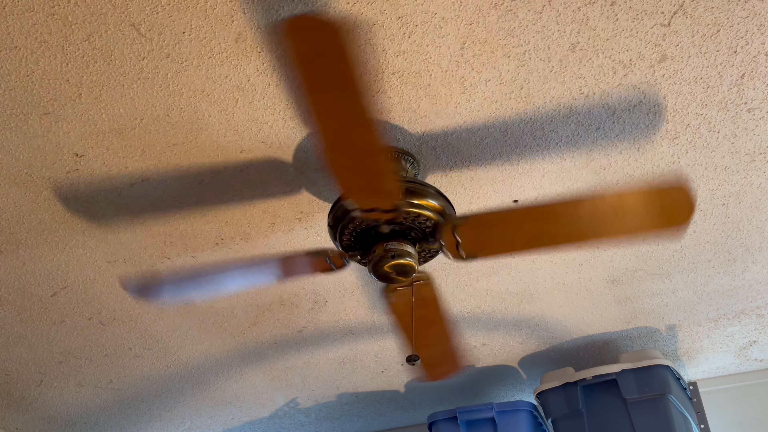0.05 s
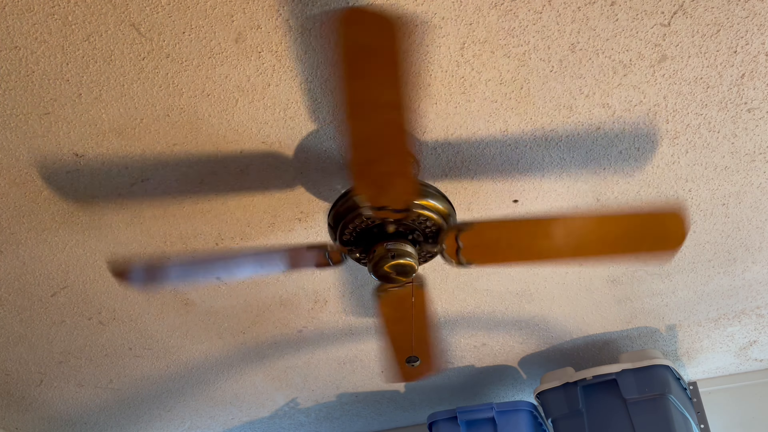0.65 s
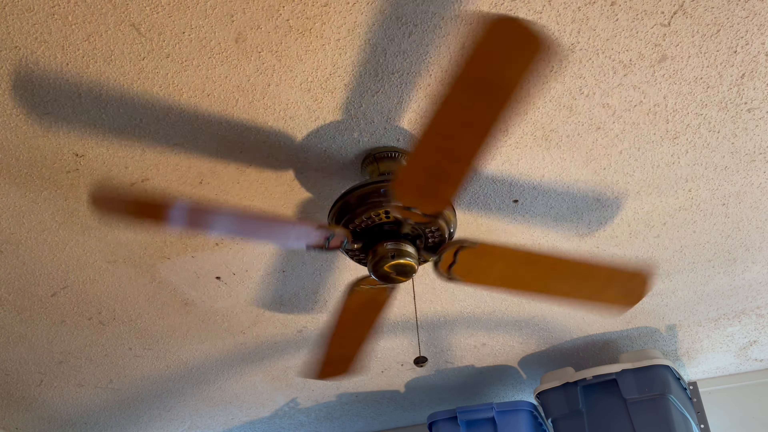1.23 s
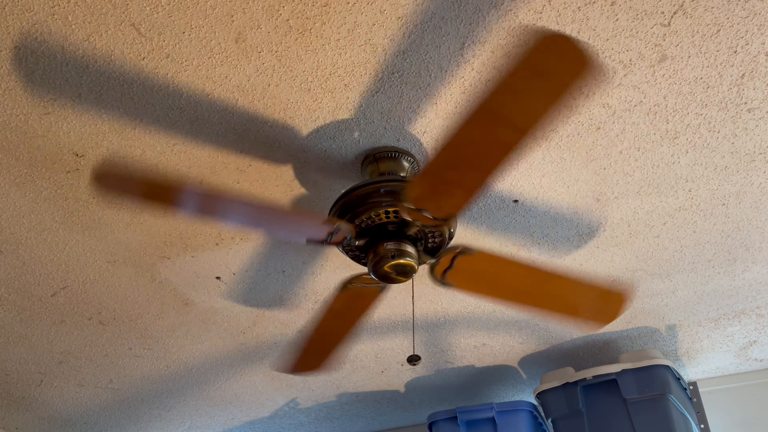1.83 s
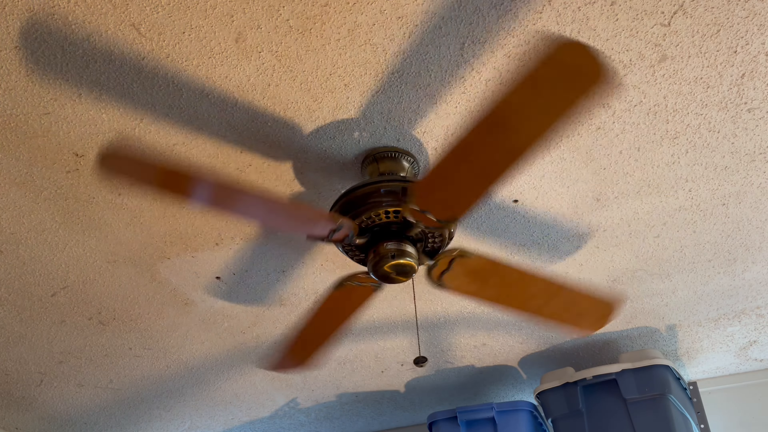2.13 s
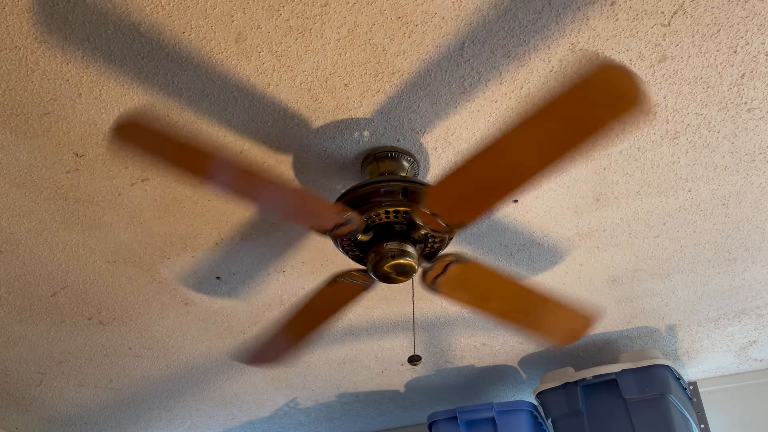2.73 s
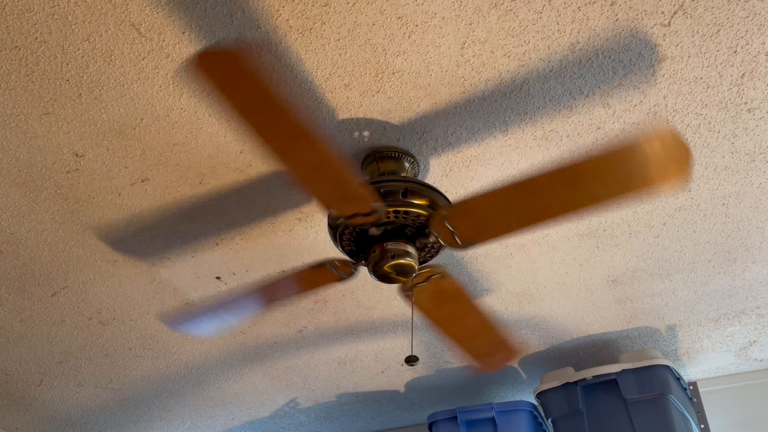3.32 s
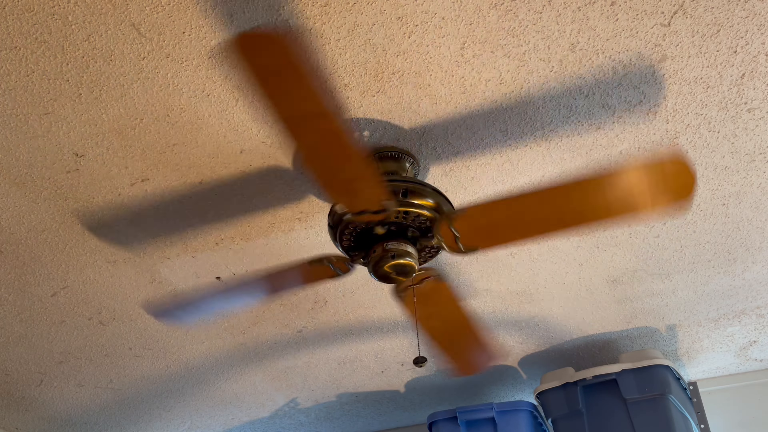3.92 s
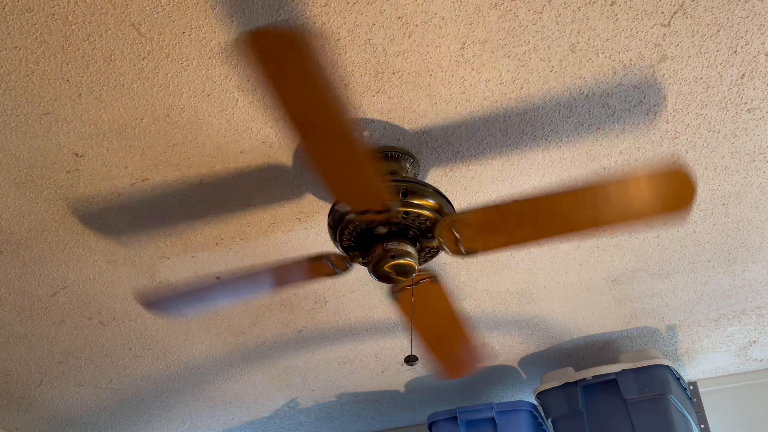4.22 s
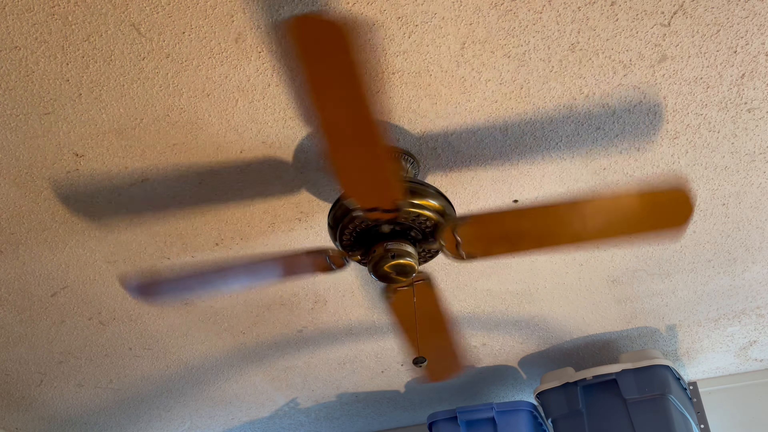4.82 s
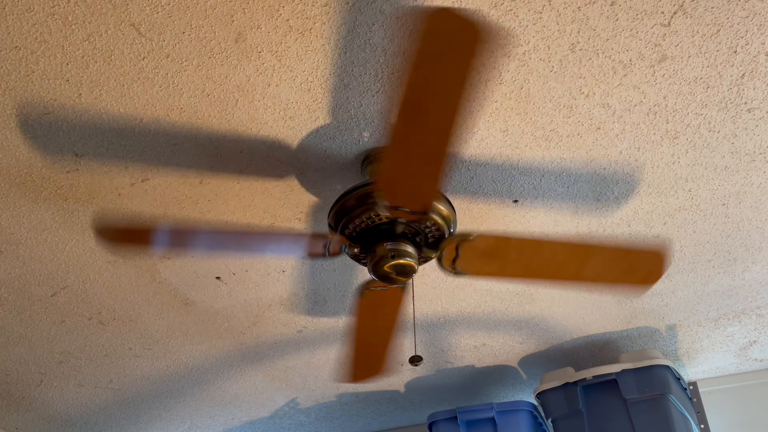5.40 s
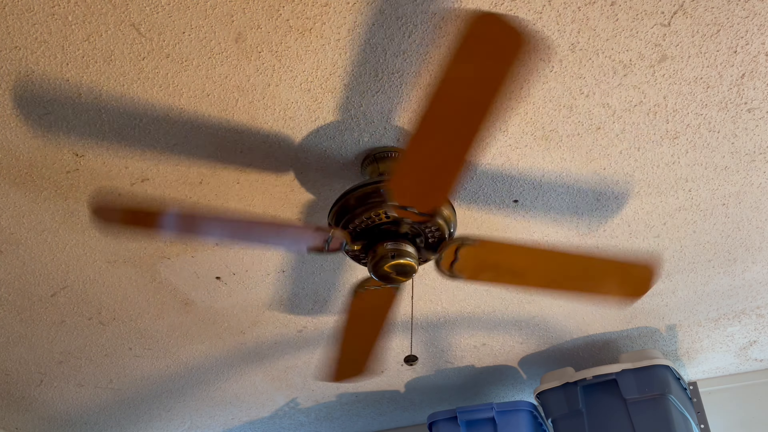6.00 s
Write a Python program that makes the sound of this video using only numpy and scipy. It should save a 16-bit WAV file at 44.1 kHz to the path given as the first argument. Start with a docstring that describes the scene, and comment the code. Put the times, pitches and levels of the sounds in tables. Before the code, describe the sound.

Indoors, a deep multi-tone motor hum dominates, swelling and wavering as it resonates in the room. It slows in two steps, sinking in pitch and fading, while a ceiling fan keeps up a gentle airy rush underneath. Thin whining tones drift in and out during the first half. Toward the end there are faint squeaks and a few brief rubs and taps of fingers on the microphone.

```python
"""Ceiling fan under a motor drone

A ceiling fan turns in a small room with a soft rush of air, under a loud motor drone, likely an engine
beyond the wall. The motor slows in two steps and grows quieter; its harmonics slide through the room's
standing waves, which make them boom. Wavering whines, a few soft swishes and faint squeaks pass.
Near the end a hand rustles and knocks on the microphone's case."""
import sys
import numpy as np
from scipy import signal
from scipy.fft import rfft, irfft, next_fast_len
from scipy.io import wavfile
from scipy.ndimage import uniform_filter1d, minimum_filter1d

SR = 44100
rng = np.random.default_rng(int(sys.argv[2]) if len(sys.argv) > 2 else 0)


def log_audio(samples):
    """Write samples as a 16-bit WAV file to the path given in sys.argv[1]."""
    # one column per channel
    frames = np.atleast_2d(samples).T
    # limit to full scale, then quantise
    limited = np.clip(frames, -1, 1)
    pcm = np.round(limited * 32767).astype(np.int16)
    wavfile.write(sys.argv[1], SR, pcm)


N = 266937
TIME = np.arange(N) / SR
FFT_SIZE = next_fast_len(N, real=True)
FREQS = np.maximum(np.arange(FFT_SIZE // 2 + 1) * SR / FFT_SIZE, 1)
SIDE = np.array([[1], [-1]])  # adds on the left, subtracts on the right
FADING_HZ = 1.7  # how fast the rumble and the low harmonics drift in level

# Fader ride for the rumble and the motor's fundamental. Each row: time in seconds, relative level in dB.
RUMBLE_RIDE = [(0, -24), (0.65, -21), (1.05, -22), (1.3, -26), (1.6, -28), (1.9, -24.5), (2.9, -30),
               (3.4, -25.5), (4.05, -24), (4.25, -32.5), (6.05, -36)]
# Resonances of the microphone's case. Each row: pitch in Hz, time to fall 60 dB in seconds,
# relative level when knocked in dB, boost when rubbed in dB.
CASE_RESONANCES = [(1390, 0.1, 1, -1), (2330, 0.065, -8, 4.5), (2720, 0.05, -4, 7), (3030, 0.06, -2, 6),
                   (3550, 0.067, -0.5, 4.5), (4530, 0.06, -11, -1.5), (4830, 0.04, -14, 3.5),
                   (6470, 0.05, -16, 3)]


def undb(db):
    """Decibels to gain."""
    return 10 ** (np.asarray(db) / 20)


def unit(x):
    """Scale to rms 1."""
    return x / np.sqrt(np.mean(np.abs(x) ** 2))


def curves(table):
    """Turn a table of timed points into one automation curve per value column."""
    times, *columns = np.transpose(table)
    return [np.interp(TIME, times, column) for column in columns]


def across(points):
    """Spread (Hz, value) points over the whole spectrum."""
    hz, value = np.transpose(points)
    return np.interp(np.log(FREQS), np.log(hz), value)


def drift(rate_hz, points=8192):
    """A smooth random wobble, rms 1, that rolls off above rate_hz."""
    hz = np.arange(points // 2 + 1) * SR / N
    slow = irfft(rfft(rng.standard_normal(points)) * np.exp(-(hz / rate_hz) ** 2))
    return np.interp(np.arange(N), np.linspace(0, N, points), unit(slow))


def room_noise(eq_db):
    """Stereo noise shaped by an EQ curve, narrow in the bass and wide above; the mid has rms 1."""
    # Stereo image. Each row: frequency in Hz, correlation of left and right.
    likeness = [(35, 0.63), (60, 0.99), (150, 0.45), (300, -0.033), (450, 0.64), (620, -0.31), (900, -0.44),
                (1400, -0.22), (2500, 0.03), (12000, -0.16)]
    correlation = across(likeness)
    gains = [undb(eq_db) * np.sqrt(1 + sign * correlation) for sign in (1, -1)]
    mid, side = (irfft(rfft(rng.standard_normal(FFT_SIZE)) * gain)[:N] for gain in gains)
    return (mid + SIDE * side) / np.std(mid)


def standing_waves(hz):
    """The room booms as a pitch crosses its modes; returns phase shift, mid gain and side gain."""
    # Each row: centre in Hz, width in Hz, mid gain in dB, side gain in dB.
    room_modes = [(52, 8.7, -20, -30.5), (84, 24, -26.5, -45), (127.4, 7.7, 13.5, -15),
                  (165.6, 7.8, 2.5, -4), (208, 10, -60, -9), (224.4, 3.96, 5.5, -8), (254.95, 6.4, 4, -1.5),
                  (280.8, 4.4, -14.5, -22.5), (295.2, 2.58, 11.5, 12), (306.6, 3.9, 1, -2),
                  (340.7, 4.1, -4, -19), (388, 8.3, -35, -11), (413.4, 5.7, -3.5, -5.5),
                  (508.6, 4.2, -5.5, -9.5), (623, 23, -18, -17), (734, 24, -28, -23.5), (844, 18, -28, -22)]
    centre, width, mid_db, side_db = np.transpose(room_modes)[:, :, None]
    grid_hz = np.arange(20, 1000)
    response = 1 / (1 + 2j * (grid_hz - centre) / width)
    shift = np.unwrap(np.angle(np.sum(response * undb(mid_db), axis=0)))
    gains = [np.linalg.norm(response * undb(db), axis=0) for db in (mid_db, side_db)]
    return [np.interp(hz, grid_hz, column) for column in (shift, *gains)]


def harmonic(phase, hz, order, flutter_hz=9):
    """One motor harmonic in the room, and its mid gain; uneven firings make higher ones flutter more."""
    shift, mid, side = standing_waves(order * hz)
    depth = 0.044 + 0.06 * order * (hz / hz.max()) ** 5  # the slow motor runs smoother
    angle = order * phase + shift + depth * drift(flutter_hz)
    wave = mid * np.cos(angle) - SIDE * side * np.sin(angle)
    return np.sqrt(2) * wave * (1 + depth * drift(flutter_hz)), mid


def drone_levels(hz, ring_s=0.047):
    """Three dB rides that follow the motor's speed: second harmonic, third harmonic, upper drone."""
    # How the drone carries at each speed. Each row: firing rate in Hz, the three relative levels in dB.
    carry = [(41.2, -32, -29, -33), (41.9, -24, -31, -29.5), (45.57, -27.5, -45.5, -33.5),
             (46.9, -23.5, -26.5, -27), (48.92, -30, -26.5, -28.5), (50.9, -22, -17, -18),
             (53, -18.5, -24, -24.5), (55.8, -15.5, -11, -18), (55.8, -6, -23, -10.5),
             (55.92, -6.5, -23.5, -16)]
    # Slow swells. Each row: time in seconds, the three offsets in dB.
    swells = [(0, -1, -2, -5), (0.2, -1.5, 0, 2.5), (0.9, 2.5, 1, -2.5), (1.25, -0.5, 2, -2.5),
              (1.5, -4, -3, -1.5), (1.9, -2, 4, 1.5), (2.35, 2.5, 1, -1.5), (2.75, 5, 0, -3),
              (3.05, 2, 3, 1), (3.5, 3, -3, -0.5), (4.3, 1.5, 5, -1.5), (4.6, -5.5, -2.5, -7),
              (4.78, 4, 5.5, -3), (5.0, -14, 3, -2), (5.2, -21, -5, -3), (5.4, 0.5, -4, -4.5),
              (5.6, -27, -3, -2.5), (6.05, -19, 6, -1)]
    # The drone falters and rebounds as the speed changes.
    # Each row: centre in seconds, half length in seconds, the three offsets in dB.
    falters = [(1.029, 0.016, -6, -8, 2.5), (1.07, 0.027, 4.5, -5.5, 3.5), (1.103, 0.0086, -15, -30, 8),
               (1.154, 0.022, 0, 0, -9), (3.672, 0.037, -10, -2, -1.5), (3.98, 0.026, -17, -3, -4),
               (4.072, 0.022, -8, -11, -5)]
    rates, *columns = np.transpose(sorted(carry))
    # the room's ringing rounds off the level changes that come with speed
    speed_db = [uniform_filter1d(np.interp(hz, rates, db), int(ring_s * SR)) for db in columns]
    falter_db = sum(np.outer(db, np.exp(-((TIME - at) / half) ** 2)) for at, half, *db in falters)
    return np.add(speed_db, curves(swells)) + falter_db


def motor(third_trim_db=-1.43, roar_db=-19):
    """The motor's firings make a weak fundamental, two booming harmonics, an upper stack and a roar."""
    # Each row: time in seconds, firing rate in Hz.
    speed = [(0, 55.8), (0.3, 56.2), (0.6, 56.5), (0.9, 57.73), (1.0, 55.92), (1.15, 51.7), (1.25, 51),
             (1.45, 51.1), (2.3, 51.26), (2.75, 51.32), (3.3, 51.42), (3.55, 50.9), (3.85, 46.08),
             (4, 46.07), (4.3, 41.8), (4.5, 41.2), (4.8, 41.9), (6.05, 41.9)]
    # Firing rates in Hz at the fast, middle and slow step.
    step_hz = [57.3, 49.7, 40.6]
    # Each row: harmonic number, then its weight in dB at the fast, middle and slow step.
    upper_harmonics = [(4, -1.5, 1.5, 0.5), (5, 2, 1.5, 6), (6, 5, 5.5, 8.5), (7, -1, 4.5, 4),
                       (8, 2.5, 1, 6), (9, -2, 0, 5.5), (10, -6, -9.5, -16), (11, -1, -4, -5),
                       (13, -5, -3, -8), (15, -0.5, -13, -9), (17, -2, -6.5, -13)]
    # The sixth harmonic fades in and out. Each row: time in seconds, offset to its weight in dB.
    sixth_ride = [(0, -3), (1.0, -4.5), (1.35, 0.5), (1.9, -5.5), (2.3, -13.5), (2.6, 0), (3.5, -1),
                  (4.3, -0.5), (4.8, -7.5), (6.05, 1)]
    # Where the boom sits. Each row: time in seconds, left minus right in dB.
    boom_pan = [(0, -2.5), (0.8, -0.5), (1.3, -5), (2.2, -2.5), (3.2, -3.5), (3.8, -0.5), (6.05, 0.5)]
    # Each row: frequency in Hz, relative level in dB.
    roar_eq = [(100, -26), (190, -10.5), (240, 3), (310, 5), (380, -7.5), (500, -6.5), (900, -39.5)]
    hz, = curves(speed)
    rumble_db, = curves(RUMBLE_RIDE)
    pan_db, = curves(boom_pan)
    sixth_db, = curves(sixth_ride)
    second_db, third_db, upper_db = drone_levels(hz)
    first_db = rumble_db - 7 + 5.5 * drift(FADING_HZ)
    phase = 2 * np.pi * np.cumsum(hz) / SR
    boom, stack, power = 0, 0, 0
    for order, db in enumerate([first_db, second_db, third_db + third_trim_db], 1):
        wave, room_gain = harmonic(phase, hz, order)
        boom = boom + wave / room_gain * undb(db + drift(FADING_HZ))
    # the upper harmonics share one level; whichever sits on a standing wave takes most of it
    for order, *step_db in upper_harmonics:
        db = np.interp(hz, step_hz[::-1], step_db[::-1])
        wave, room_gain = harmonic(phase, hz, order)
        weight = undb(db + sixth_db * (order == 6))
        stack = stack + weight * wave
        power = power + (weight * room_gain) ** 2
    roar = room_noise(across(roar_eq)) * undb(roar_db)
    return boom * undb(SIDE * pan_db / 2) + (stack / np.sqrt(power) + roar) * undb(upper_db)


def rumble(trim_db=-3):
    """A bed of low noise in the room that ebbs unevenly."""
    # Each row: frequency in Hz, relative level in dB.
    rumble_eq = [(12, -22.5), (30, -18.5), (38, -10.5), (47, 6), (56, 10.5), (68, 0.5), (81, 0), (95, 4.5),
                 (130, -11), (200, -33), (600, -73.5)]
    ride_db, = curves(RUMBLE_RIDE)
    return room_noise(across(rumble_eq)) * undb(ride_db + trim_db + drift(FADING_HZ))


def reflections(points=1500, ripple_db=1.5):
    """Wall echoes comb a broad sound into fine peaks and dips: a random EQ ripple in dB."""
    return ripple_db * np.interp(FREQS, np.linspace(0, SR / 2, points), rng.standard_normal(points))


def fan(blade_hz=7.4, pulse_db=0.33, settle_s=4.06, hiss_pan_db=3.5):
    """A rush of air that starts strong and settles, and a thin hiss; both lift a touch at each blade."""
    # Two EQ curves. Each row: frequency in Hz, relative level in dB.
    rush_eq = [(20, -26), (60, -18), (110, 7.5), (190, 7), (300, 9.5), (370, 2.5), (440, 5.5), (560, -2.5),
               (700, 0.5), (880, -0.5), (1200, -4.5), (1700, -10.5), (2500, -17), (4000, -23), (7000, -29),
               (12000, -41)]
    hiss_eq = [(300, -39), (1000, 13), (2500, -3), (4200, 2.5), (6400, 6), (7300, 0), (9300, 0),
               (11500, -5.5), (13000, -17)]
    # Each row: time in seconds, relative level in dB.
    hiss_ride = [(0, -59), (1.1, -59), (2.3, -51.5), (3.7, -52.5), (4.4, -56.5), (6.05, -56)]
    rush_db = -35 + 8.5 * np.exp(-TIME / settle_s)
    hiss_db = curves(hiss_ride)[0] + 4 + SIDE * hiss_pan_db / 2
    rush = room_noise(across(rush_eq) + reflections()) * undb(rush_db + 0.45 * drift(rate_hz=2.4))
    hiss = room_noise(across(hiss_eq)) * undb(hiss_db + 1.2 * drift(rate_hz=21))
    return (rush + hiss) * undb(pulse_db * np.sin(2 * np.pi * blade_hz * TIME))


def blurred_tone(hz, width_hz, steady):
    """A tone whose level and phase wander around a steady core, smearing it into a band; rms 1."""
    phase = 2 * np.pi * np.cumsum(hz * np.ones(N)) / SR
    return unit((steady + drift(width_hz)) * np.cos(phase) + drift(width_hz) * np.sin(phase))


def hums():
    """Two narrow hums hang in the room throughout."""
    # Each row: pitch in Hz, width in Hz, level in dB.
    tones = [(81.2, 3.7, -32), (879, 35, -53)]
    return sum(undb(db) * blurred_tone(hz, width, steady=1.1) for hz, width, db in tones)


def glides(table, fade_s, width_hz, steady=0, waver=0):
    """Blurred tones that fade in, slide in pitch and fade out."""
    out = 0
    for start, length, hz, hz_per_s, db in table:
        age = np.clip(TIME - start, 0, length)
        envelope = np.minimum(np.minimum(age, length - age) / fade_s, 1)
        pitch = (hz + hz_per_s * age) * (1 + waver * drift(1 / fade_s))
        out = out + undb(db) * envelope * blurred_tone(pitch, width_hz, steady)
    return out


def whines():
    """Wavering tones come and go beside the drone."""
    # Each row: start in seconds, length in seconds, pitch in Hz, glide in Hz per second, level in dB.
    tones = [(0.23, 0.96, 357.5, 0, -28), (1.02, 1.34, 432, -9, -32.5), (1.43, 0.58, 429, -3, -31),
             (1.1, 1.07, 329, -6, -37), (1.25, 0.675, 539, -5, -43.5), (1.205, 2.015, 560, 1.5, -47.5),
             (1.096, 1.86, 120.5, -1.5, -32), (1.693, 1.56, 46.2, 3, -26.5)]
    return glides(tones, fade_s=0.12, width_hz=9, steady=4)


def stroke(peak, rise, decay):
    """An envelope that swells to its peak and dies away; times in seconds."""
    return np.exp(-np.minimum(np.maximum((peak - TIME) / rise, (TIME - peak) / decay), 20))


def swishes(frame=1024):
    """Soft bands of noise swell and fade, sliding down or holding their pitch."""
    # Each row: peak time, rise and decay in seconds, centre in Hz, glide in octaves per second,
    # width in octaves, level in dB.
    passes = [(0.36, 0.063, 0.12, 1045, -0.3, 0.22, -33), (1.5, 0.18, 0.23, 2440, -1.5, 0.84, -39.5),
              (3.35, 0.3, 0.17, 1600, 0, 0.74, -44)]
    hz, times, spectra = signal.stft(rng.standard_normal((2, N)), SR, nperseg=frame)
    out = 0
    for peak, rise, decay, centre, glide, width, db in passes:
        slide = glide * np.clip(times - peak, -rise, decay)
        octaves = np.log2(np.maximum(hz, 1) / centre)[:, None] - slide
        band = 1 / (1 + (octaves / width) ** 2) ** 2
        _, swish = signal.istft(spectra * band / np.linalg.norm(band, axis=0), SR, nperseg=frame)
        out = out + undb(db) * stroke(peak, rise, decay) * unit(swish[:, :N])
    return out


def squeaks():
    """Faint raspy chirps, with a different grain left and right."""
    # Each row: start in seconds, length in seconds, pitch in Hz, glide in Hz per second, level in dB.
    chirps = [(1.28, 0.11, 3750, 7500, -51), (2.52, 0.14, 3693, 1200, -54), (4.36, 0.083, 2630, 600, -49),
              (4.38, 0.095, 2920, -300, -49), (4.515, 0.09, 2620, -900, -47), (4.58, 0.09, 2363, -500, -48),
              (4.6, 0.12, 2500, 500, -50), (4.765, 0.15, 2830, -1200, -47), (4.97, 0.18, 2540, 98, -49)]
    return np.array([glides(chirps, fade_s=0.0273, width_hz=140, waver=0.009) for _ in range(2)])


def hand_rustle(ring_width_hz=220, bite_db=5, bite_octaves=0.29):
    """Skin catches and slips on the case in short strokes that make it ring, each with its own bite."""
    # Each row: peak time, rise and decay in seconds, level in dB, tilt in dB per octave, bite in Hz.
    rubs = [(4.757, 0.003, 0.0079, -39.5, -3, 5400), (4.79, 0.032, 0.075, -39.5, -6, 4600),
            (4.931, 0.0033, 0.0099, -33, -12, 3400), (4.962, 0.041, 0.038, -34.5, -0.5, 3300),
            (5.069, 0.0014, 0.005, -33.5, -3.5, 3900), (5.106, 0.0019, 0.0059, -39, 3, 9100),
            (5.131, .002, 0.0081, -42, -5, 2900), (5.924, 0.017, 0.034, -31.5, -3.5, 3150),
            (5.984, 0.0074, 0.0081, -41, -4, 3000), (6.027, 0.0031, 0.021, -34.5, 0, 6300)]
    # Tone of the rubbed case. Each row: frequency in Hz, relative level in dB.
    case_eq = [(200, -48.5), (1000, -24), (1400, -4), (2100, -7), (3100, -10), (4200, -4.5), (6500, -5.5),
               (7500, -7), (11500, -13), (13000, -35)]
    grain = unit(undb(0.5 * drift(rate_hz=160)))
    ring_db = sum(db / (1 + (2 * (FREQS - hz) / ring_width_hz) ** 2) for hz, _, _, db in CASE_RESONANCES)
    colour_db = across(case_eq) + ring_db + reflections()
    octaves = np.log2(np.maximum(FREQS, 1000))  # the tilt acts above 1 kHz
    friction = rfft(rng.standard_normal((2, FFT_SIZE)))
    out = 0
    for peak, rise, decay, db, tilt, bite_hz in rubs:
        bite = bite_db * np.exp(-(np.log2(FREQS / bite_hz) / bite_octaves) ** 2)
        rub = irfft(friction * undb(colour_db + bite + tilt * octaves))[:, :N]
        out = out + undb(db) * stroke(peak, rise, decay) * unit(rub)
    return out * grain


def finger_knocks(contact_s=0.001):
    """A finger strikes the case, whose modes ring on and reach left and right in their own phase."""
    # Each row: start in seconds, level in dB.
    hits = [(4.931, -30), (4.946, -37), (4.963, -35), (5.07, -41)]
    out = np.zeros((2, N))
    for start, db in hits:
        age = TIME[TIME >= start] - start
        attack = 1 - np.exp(-age / contact_s)
        for hz, t60, mode_db, _ in CASE_RESONANCES:
            decay = np.exp(-np.log(1000) * np.minimum(age / t60, 2))
            ring = np.sin(2 * np.pi * (hz * age + rng.random((2, 1))))
            out[:, N - len(age):] += undb(db + mode_db) * attack * decay * ring
    return out


def scene():
    """Mix the drone and lesser tones, the moving air and the hand on the case."""
    tones = motor() + whines() + hums() + squeaks()
    air = rumble() + fan() + swishes()
    return tones + air + hand_rustle() + finger_knocks()


def record(dry, limiter_samples=500, top_hz=12400):
    """A limiter holds the peaks at full scale, then a steep low-pass cuts the top."""
    needed_gain = 1 / np.maximum(np.abs(dry).max(axis=0), 1)
    gain = uniform_filter1d(minimum_filter1d(needed_gain, limiter_samples), limiter_samples)
    low_pass = signal.ellip(8, 0.02, 50, top_hz, fs=SR, output="sos")
    return signal.sosfiltfilt(low_pass, dry * gain)


dry = scene()
out = record(dry)
log_audio(out)
```